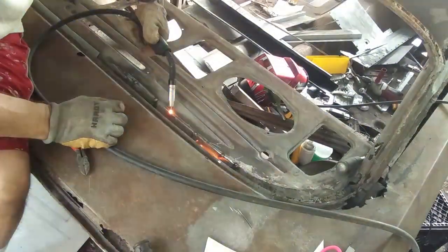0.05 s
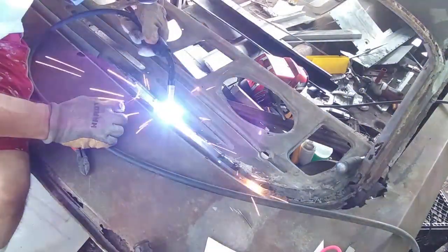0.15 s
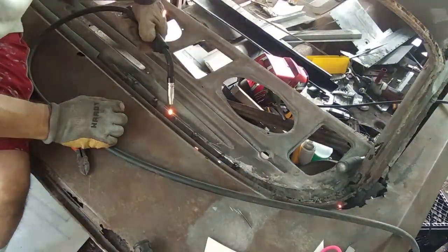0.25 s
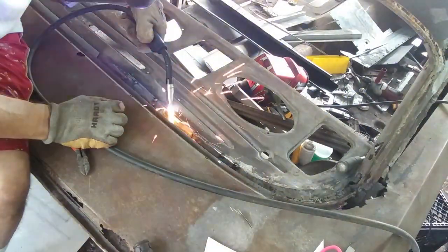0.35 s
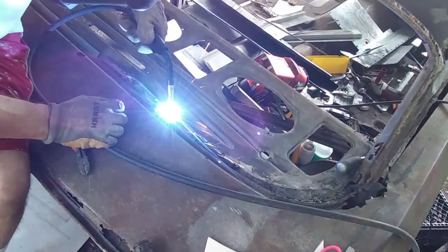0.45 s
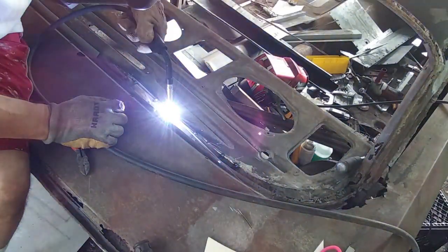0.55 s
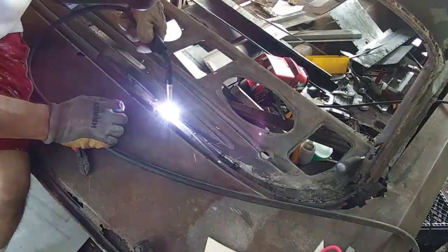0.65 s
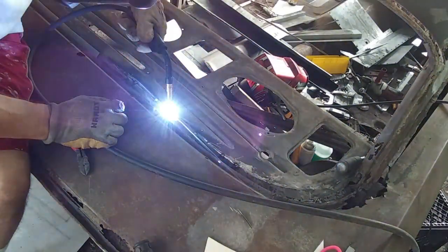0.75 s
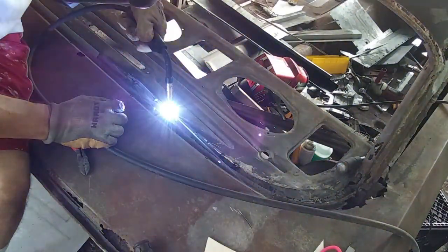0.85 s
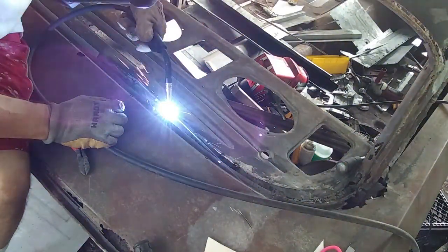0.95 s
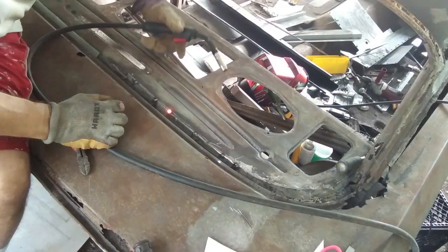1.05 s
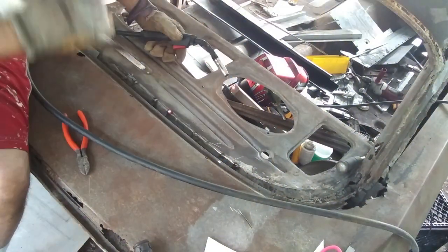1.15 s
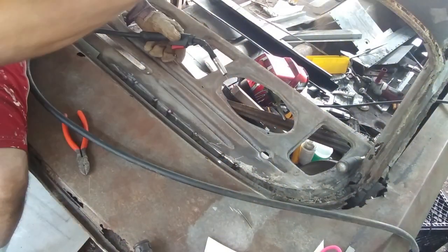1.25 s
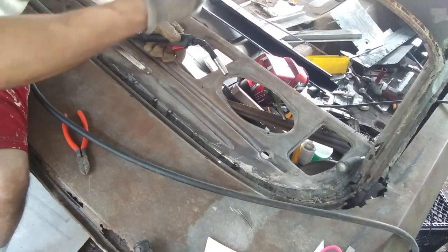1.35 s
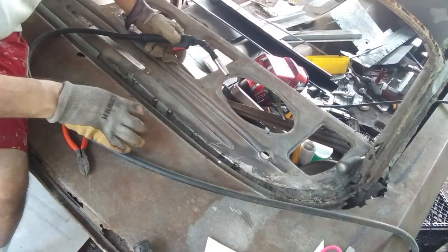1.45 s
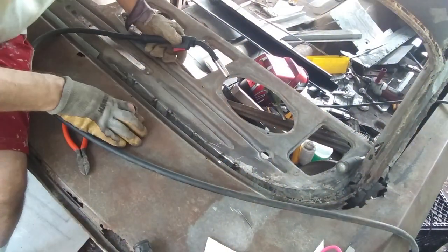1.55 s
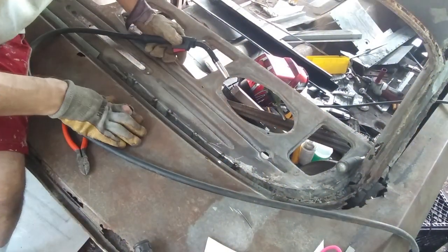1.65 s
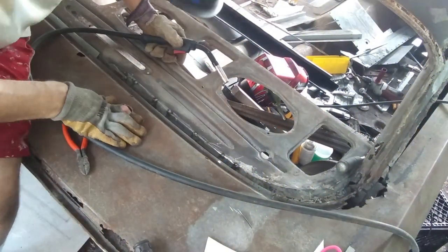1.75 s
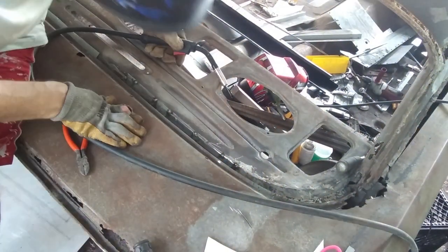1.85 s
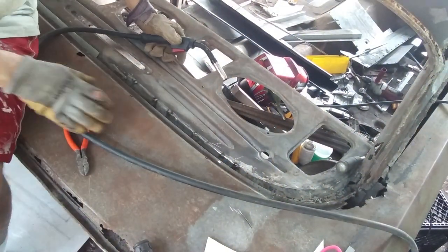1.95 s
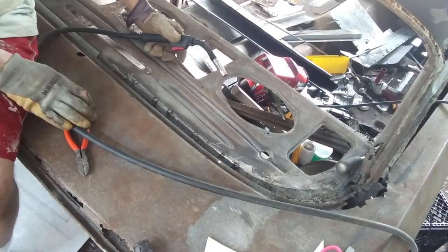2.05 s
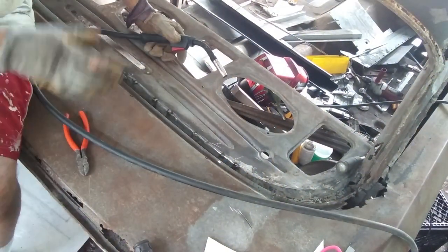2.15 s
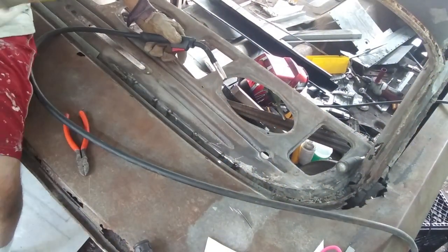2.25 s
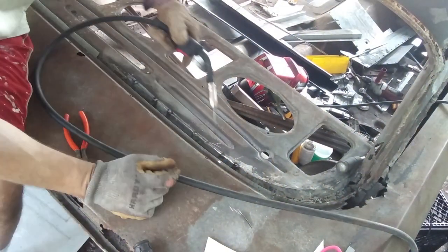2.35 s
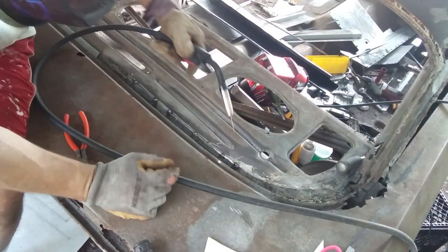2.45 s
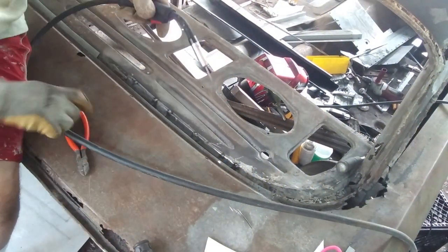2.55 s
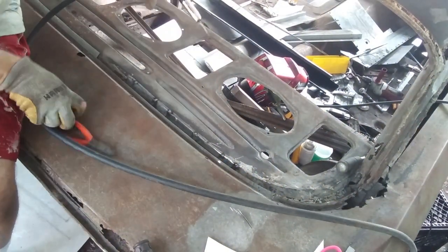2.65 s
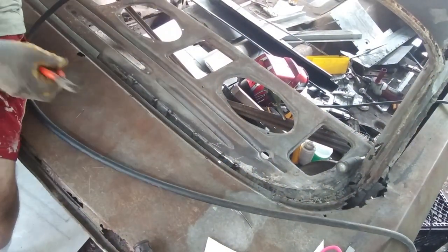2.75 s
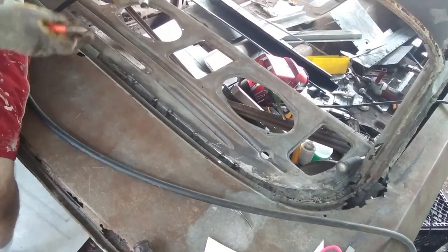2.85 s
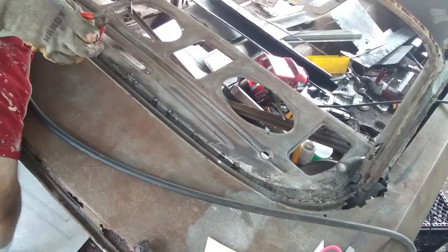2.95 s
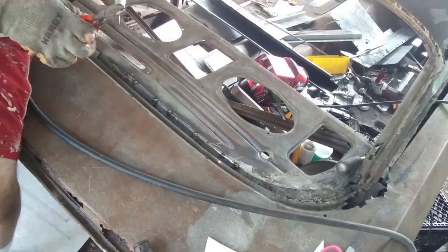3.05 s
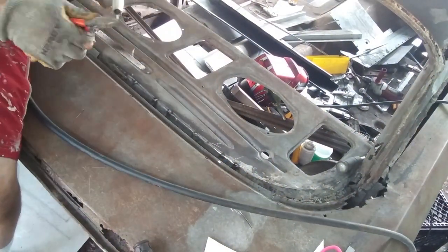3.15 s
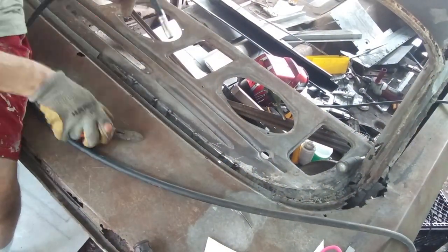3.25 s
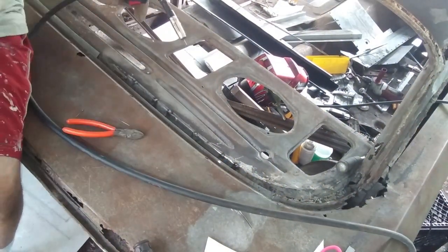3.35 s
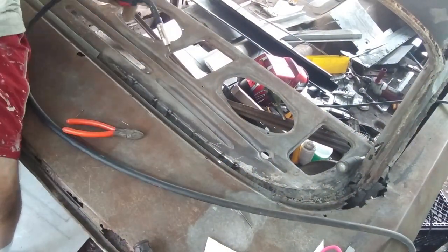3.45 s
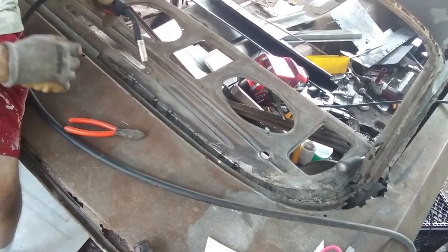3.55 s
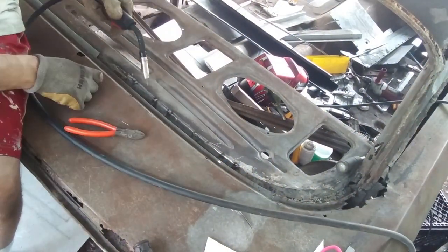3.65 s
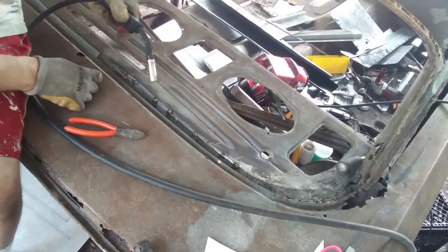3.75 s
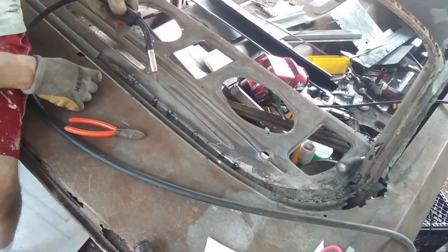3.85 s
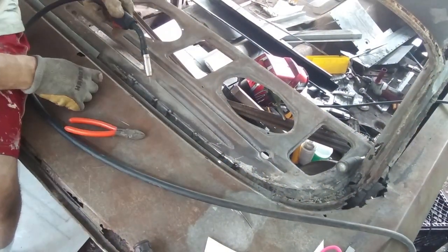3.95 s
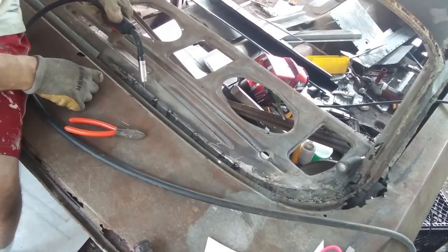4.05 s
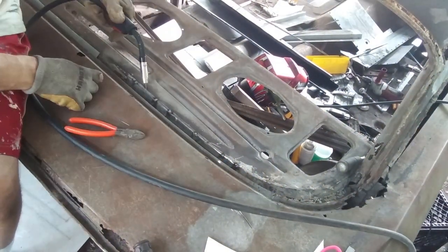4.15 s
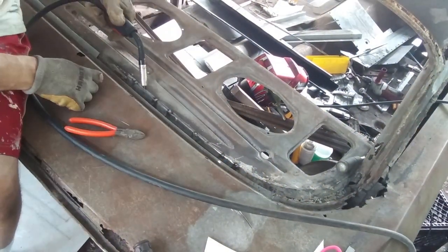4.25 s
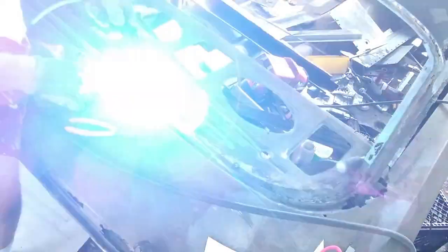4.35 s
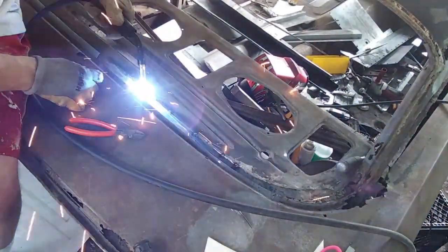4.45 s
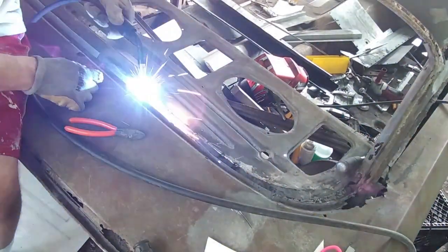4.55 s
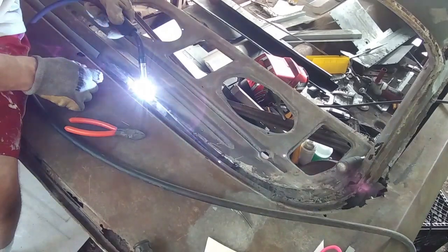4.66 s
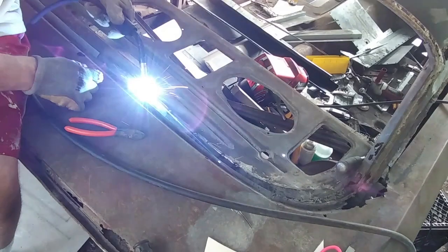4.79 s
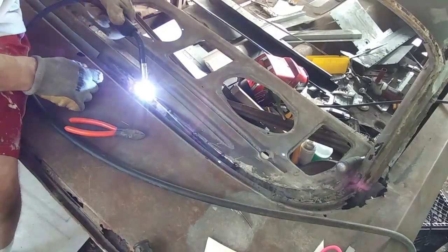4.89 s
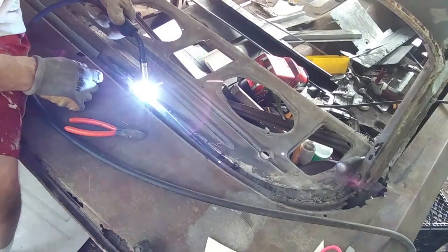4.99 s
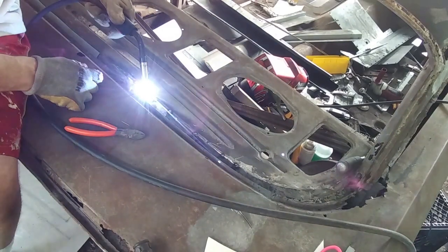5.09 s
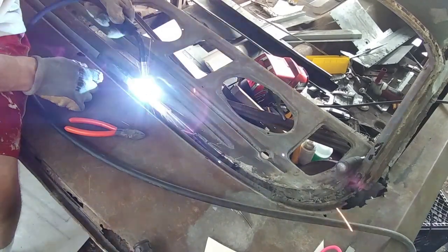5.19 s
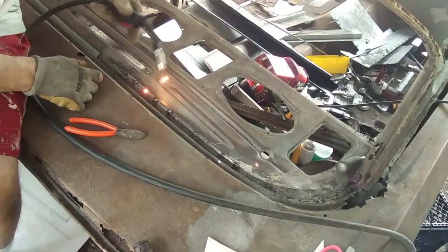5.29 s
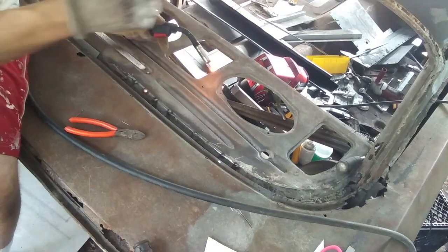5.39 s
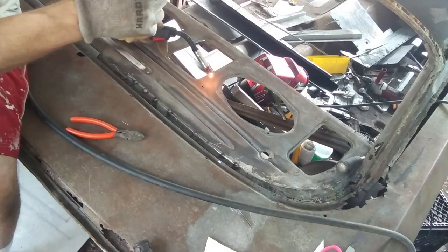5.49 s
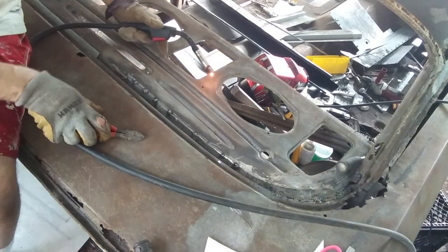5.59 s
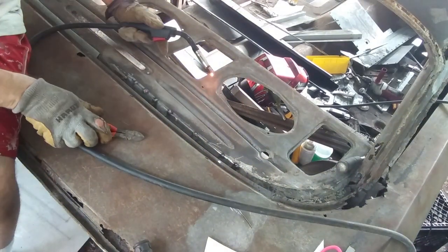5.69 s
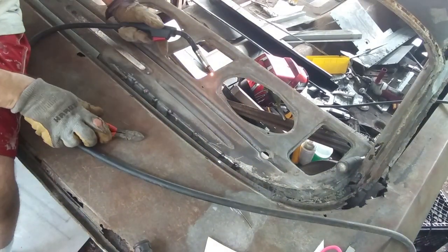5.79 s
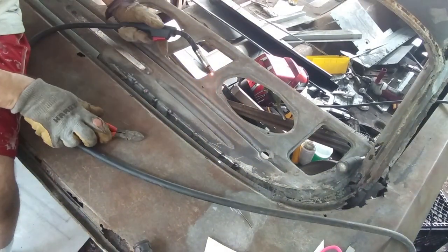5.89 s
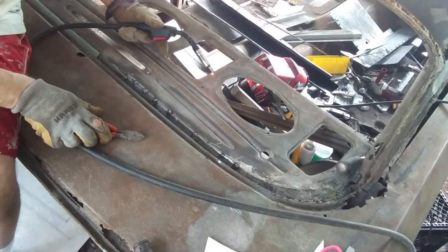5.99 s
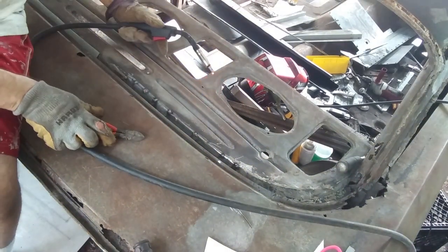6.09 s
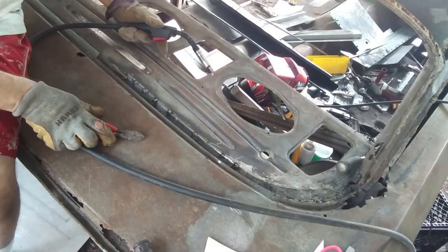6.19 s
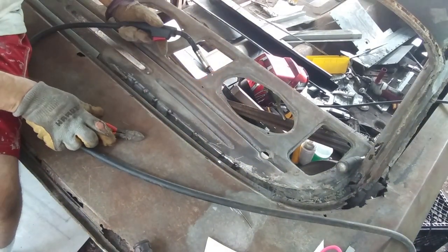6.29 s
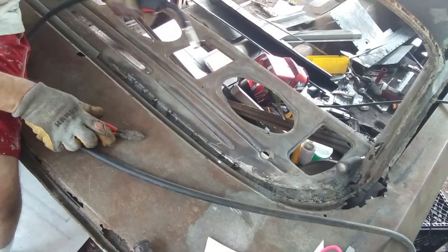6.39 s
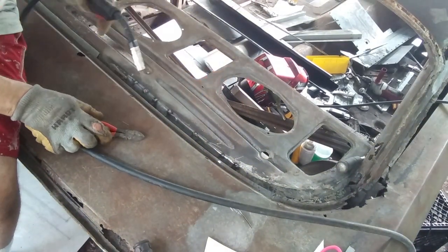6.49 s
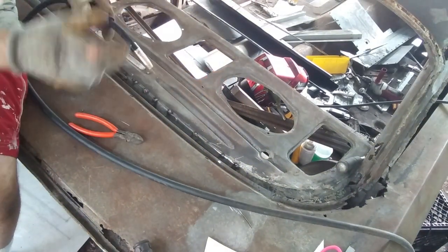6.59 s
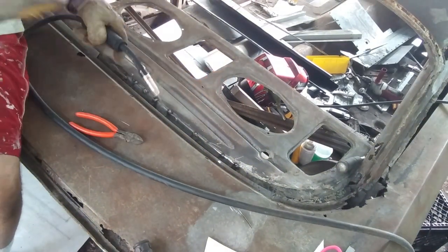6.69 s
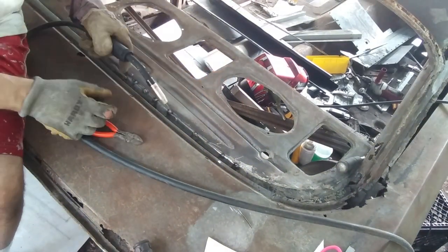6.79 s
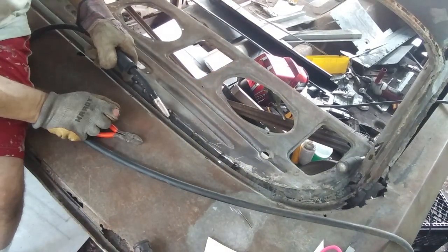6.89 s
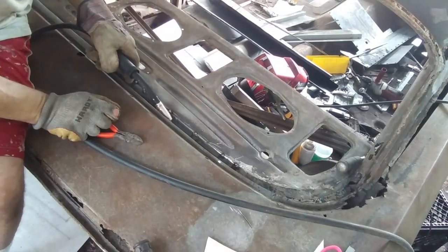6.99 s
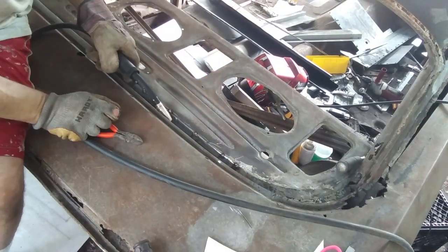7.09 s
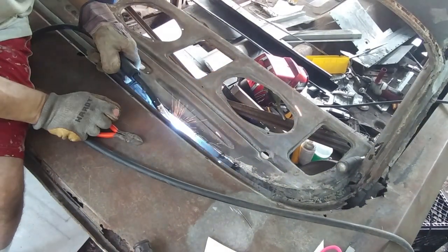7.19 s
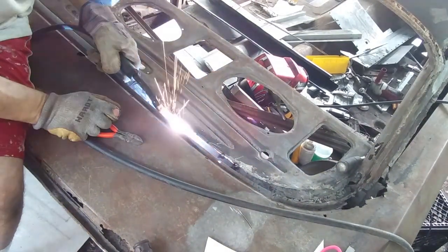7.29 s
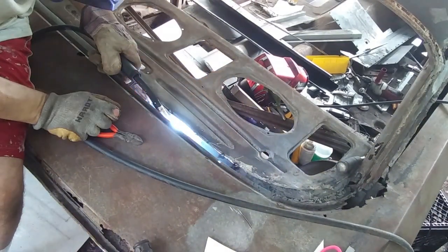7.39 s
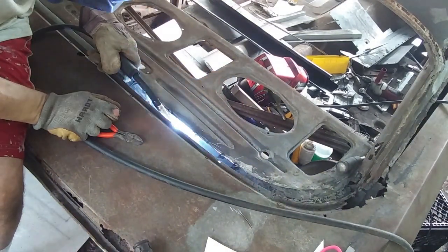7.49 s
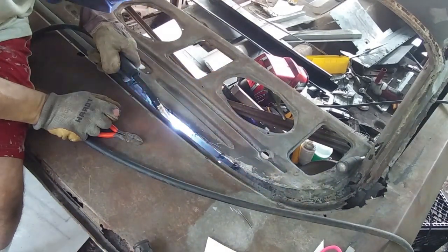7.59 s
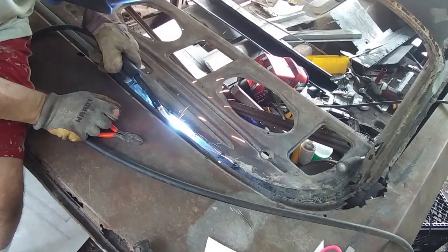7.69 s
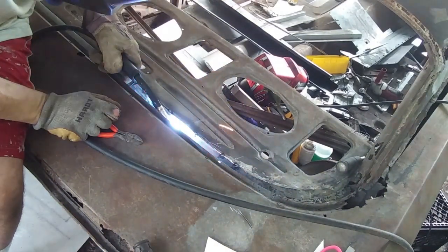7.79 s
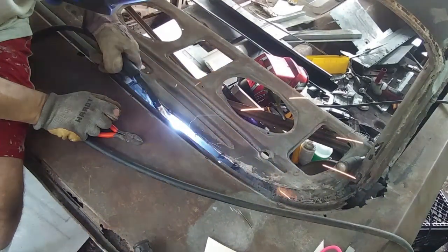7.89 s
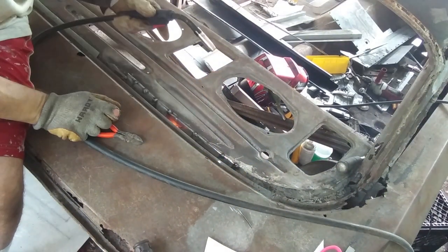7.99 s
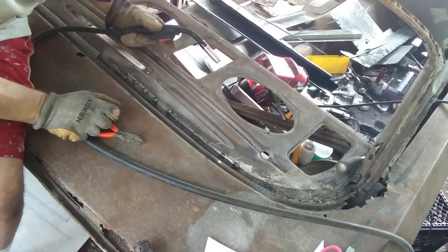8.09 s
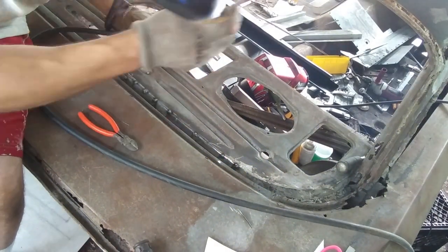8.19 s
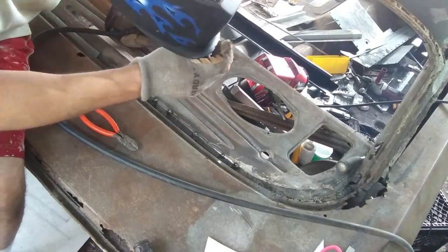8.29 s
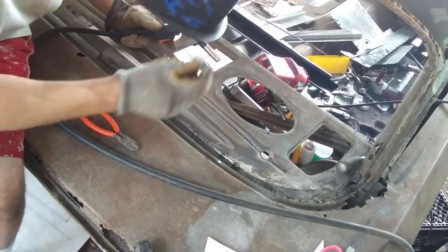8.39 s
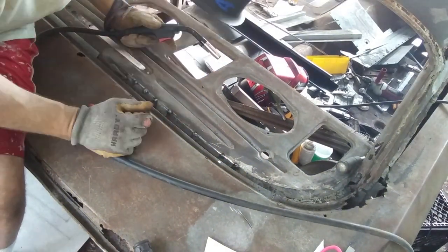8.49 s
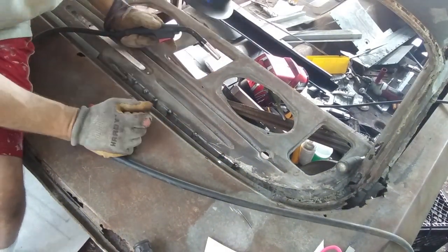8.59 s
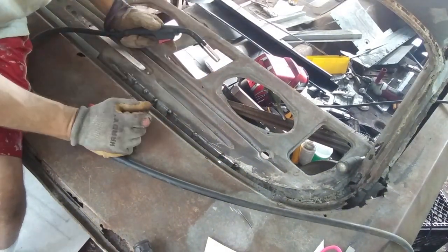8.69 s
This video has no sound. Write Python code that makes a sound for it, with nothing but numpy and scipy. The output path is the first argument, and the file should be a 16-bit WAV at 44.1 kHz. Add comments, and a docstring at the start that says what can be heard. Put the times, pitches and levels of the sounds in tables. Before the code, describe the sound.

A wire welder crackles and spits in three short beads on a sheet-steel door, with tool clatter between, over steady fan rush and faint whine.

```python
"""A workshop where a MIG welder lays three short beads on a sheet-steel car door, heard close up.
The arc is noise that hisses and spits; each short of the wire into the pool pops as a click and a scatter.
Between beads, cutters and torch knock and ring as bursts and modes, and slides rub as filtered noise.
The live wire grazes the door once, in gritty bursts. Under it all a fan rushes and whines, a far motor
sags under load and other machines whistle faintly, as drifting sine tones."""
import sys
import numpy as np
from scipy import signal
from scipy.fft import irfft, next_fast_len
from scipy.io import wavfile
from scipy.ndimage import uniform_filter1d

SR = 44100
rng = np.random.default_rng(int(sys.argv[2]) if len(sys.argv) > 2 else 0)


def wrap_up_sound(samples):
    """Save the sound to the file named by the first command line argument, as 16-bit audio."""
    columns = np.atleast_2d(samples).T
    # keep every value between -1 and 1, then stretch to whole-number steps
    tamed = np.clip(columns, -1, 1)
    steps = np.round(tamed * 32767).astype(np.int16)
    wavfile.write(sys.argv[1], SR, steps)


N = 385434
TIME = np.arange(N) / SR

# resonances of the sheet-steel door, scaled by each user's depth: (centre_hz, width_hz, height_db)
DOOR = [(1910, 140, 2.5), (2170, 110, 2.4), (2520, 630, 7), (3273, 169, 5), (3530, 160, 9.5),
        (4010, 380, 12.5), (4360, 87, 11), (4790, 140, 11.5), (5180, 85, -6), (5165, 250, 14),
        (5596, 136, 14), (5970, 130, 11), (6472, 193, 14.5), (6950, 400, 13), (7270, 120, 2.5),
        (7714, 70, 13.5), (9130, 260, 2.5), (9840, 220, 10), (10070, 170, 10), (10560, 110, 13.5),
        (11320, 510, 9), (12400, 89, 10), (12770, 430, -2.5), (13264, 184, 4.5), (13300, 450, -13.5),
        (14000, 144, -3)]
# burning arcs: (start_s, end_s, relative hiss_db, strike flare_db, burnback_change_db, pop crack_over_ring_db)
ARCS = [(0, 0.067, -41.5, 4.5, -0.5, 15), (0.13, 0.279, -43, 8.5, 0.5, 20),
        (0.378, 1.091, -42, 8, -2.5, 16), (4.311, 5.331, -42.5, 11.5, 0, 15),
        (7.155, 7.298, -40.5, 7.5, 0.5, 11), (7.352, 8.044, -41, 8.5, -6.5, 11)]


def amp(db):
    """Decibels to gain."""
    return 10 ** (np.asarray(db) / 20)


def unit(x):
    """Scales to an rms of 1."""
    return x / np.sqrt(np.mean(x ** 2) + 1e-20)


def add(mix, s, sound):
    """Mixes a sound in at time s, in place."""
    part = mix[max(0, round(s * SR)):][:len(sound)]
    part += sound[:len(part)]


def drift(top_hz):
    """Smooth random movement of rms 1, with all rates of change up to top_hz."""
    size = next_fast_len(N, real=True)
    count = int(top_hz * size / SR) + 1
    spectrum = rng.standard_normal((count, 2)) @ [1, 1j]
    return unit(irfft(spectrum, size)[:N])


def band(x, hz, kind, order=2):
    """Butterworth filter."""
    return signal.sosfilt(signal.butter(order, hz, kind, fs=SR, output="sos"), x)


def colour(x, spectrum, resonances, depth, size=4096):
    """Minimum-phase filter of unit power: a smooth spectrum with resonances standing on it."""
    hz = abs(np.fft.fftfreq(size, 1 / SR))
    points, level = np.transpose(spectrum)
    smooth = np.interp(np.log(hz + 1), np.log(points), level)
    ripple = sum(db * np.exp(-np.log(2) * (2 * (hz - f) / width) ** 2) for f, width, db in resonances)
    # the resonances leave the broad balance alone
    ripple = ripple - uniform_filter1d(ripple, size // 16, mode="wrap")
    gain = amp(np.maximum(smooth + depth * ripple, -90))
    taps = np.fft.ifft(np.exp(np.conj(signal.hilbert(np.log(gain))))).real[:size // 2]
    return signal.oaconvolve(x, taps / np.linalg.norm(taps))[:N]


def thud(db, t60=0.023, top_hz=1300):
    """A dull low thud: one low-passed impulse with a short decaying flutter."""
    t = np.arange(SR // 30) / SR
    push = rng.standard_normal(len(t)) * amp(-60 * t / t60) * .08
    push[0] += 1
    push = band(push, top_hz, "low")
    return amp(db - 5.0) * unit(push)


def bursts(rows, spectrum, resonances, depth, grain_db, rise_s, treble_decay):
    """Sudden gritty bursts that ring in steel in three bands; the treble dies first."""
    # crossovers between low, middle and high: (low_hz, high_hz)
    band_edges = [4500, 9000]
    out = np.zeros(N)
    grit = rng.standard_normal(N) * amp(grain_db * drift(2700))
    steel = colour(grit, spectrum, resonances, depth)
    low, high = band_edges
    parts = [band(steel, low, "low", order=5),
             band(steel, [low, high], "band", order=5),
             band(steel, high, "high", order=5)]
    t = np.arange(SR // 4) / SR
    rise = 1 - np.exp(-t / rise_s)
    for k, part in enumerate(parts):
        power = np.zeros(N)
        for s, *levels, t60 in rows:
            band_t60 = t60 * treble_decay ** (k - 1)
            add(power, s, (amp(levels[k] - 60 * t / band_t60) * rise) ** 2)
        out += np.sqrt(power) * unit(part)
    return out


def ringing(modes, damping):
    """One blow on a set of decaying modes with random phases, scaled to a peak of 1."""
    t = np.arange(SR // 4) / SR
    ring = np.zeros(len(t))
    for hz, db, t60 in modes:
        decay = amp(db - 60 * t * damping / min(t60, .25))
        ring += decay * np.sin(2 * np.pi * (hz * t + rng.random()))
    return ring / abs(ring).max()


def reflect(x):
    """Nearby steel throws the sound back a few times."""
    # echoes from nearby steel: (delay_s, level_db)
    echoes = [(.0032, -12.5), (0.011, -11), (.0175, -22), (.0186, -39)]
    out = x.copy()
    for delay, db in echoes:
        add(out, delay, amp(db) * x)
    return out


def workshop(x, room_db=-21, t60=0.32, treble_t60=0.084):
    """A faint diffuse tail from the walls, shorter in the treble."""
    t = np.arange(SR // 2) / SR
    wash = rng.standard_normal(len(t)) * (1 - np.exp(-t / 0.055))
    body = band(wash, 4000, "low") * amp(-60 * t / t60)
    # played backwards, the wash is at full strength early on
    treble = band(wash[::-1], 8400, "high") * amp(-60 * t / treble_t60) * (t > .008)
    tail = body + treble
    return x + amp(room_db) * signal.fftconvolve(x, tail / np.linalg.norm(tail))[:N]


def far_whistles(waver_db=5.0, wander=.002):
    """Thin tones of far machines glide as they swell in and out."""
    # whistles: (start_s, length_s, first_hz, last_hz, level_db before the waver)
    whistle_rows = [(1.6, .45, 790, 960, -97), (2.346, 1.14, 1190, 1167, -87),
                    (4.6, 2.18, 991.4, 970, -88.5), (5.779, .22, 1490, 1395, -79),
                    (6.923, 0.24, 1032, 1154, -85), (8, 0.24, 1063, 1154, -76.5)]
    out = np.zeros(N)
    waver = amp(waver_db * drift(5))
    bend = 1 + wander * drift(20)
    for s, length, first_hz, last_hz, db in whistle_rows:
        along = np.clip((TIME - s) / length, 0, 1)
        hz = (first_hz + (last_hz - first_hz) * along) * bend
        swell = np.sqrt(2 * abs(np.sin(np.pi * along)))
        out += amp(db) * swell * np.sin(2 * np.pi * np.cumsum(hz) / SR)
    return out * waver


def far_motor(waver_db=3.0, wander=.002):
    """A far motor sags under load and picks up again; its harmonic partials fade in and out."""
    # speed and loudness over time: (time_s, pitch_hz, level_db)
    motor_course = [(0, 550, -78), (.8, 538, -90), (.92, 541.5, -75), (1.45, 540, -78.5), (1.9, 536, -86),
                    (2.4, 538, -80.5), (2.7, 535, -79.5), (3.28, 526, -77.5), (3.45, 579, -73.5),
                    (3.619, 592, -74.5), (3.85, 558, -70.5), (4, 545, -75), (4.299, 524.5, -82),
                    (4.7, 509, -68.5), (5.2, 499, -83), (6, 511, -85.5), (6.85, 511, -79.5),
                    (7.3, 515, -89)]
    # harmonics: (multiple of the pitch, relative level_db)
    motor_partials = [(1, -25), (2, -9.5), (3, 2), (4, 0), (5, -1)]
    # one partial sings out: (centre_s, length_s, multiple, lift_db)
    motor_sings = [(0.976, 0.29, 3, 13.5), (1.435, 0.45, 5, 16), (2.941, .2, 5, 15.5), (3.12, .25, 4, 19),
                   (3.888, 0.82, 5, 13), (4.096, 1.75, 2, 14)]
    s, *columns = np.transpose(motor_course)
    hz, level = (np.interp(TIME, s, c) for c in columns)
    phase = 2 * np.pi * np.cumsum(hz * (1 + wander * drift(22.3))) / SR
    out = np.zeros(N)
    for k, db in motor_partials:
        lift = np.zeros(N)
        for at, length, multiple, lift_db in motor_sings:
            if multiple == k:
                add(lift, at - length / 2, lift_db * np.hanning(int(length * SR)))
        out += amp(level + db + lift + waver_db * drift(8.2)) * np.sin(k * phase)
    return np.sqrt(2) * out


def fan(wander=0.00076, waver_db=1.6, swell_db=.5, rattle=.3, rattle_db=3.0, fade_db=1.0):
    """Air noise rushes through the welder's housing under a wavering whine and a rattly bearing."""
    # the fan's speed follows the mains: (time_s, pitch_hz)
    fan_speed = [(0, 469.8), (3.6, 467.3), (4, 466.3), (5.7, 466), (6.4, 468.6), (6.8, 471.3), (7.9, 472.3),
                 (8.12, 471.1), (8.74, 470.7)]
    # whine at the usual speed: (multiple of the pitch, level_db)
    whine_partials = [(16, -75.5), (20, -63.5), (24, -69.5), (28, -83), (32, -77)]
    # the bearing moves to its lower tone as the fan speeds up: (multiple, level_db, change_db per Hz of speed)
    bearing_tones = [(7, -70, 2), (14, -67, -2.6)]
    # smooth colour of the air: (frequency_hz, relative level_db)
    air_colour = [(18, -67), (30, -32), (596, -35), (981, -26), (1660, -12.5), (2150, -6), (2950, -4),
                  (3190, -5.5), (3830, -1.5), (5390, -4), (5990, -3.5), (8640, -8), (9600, -7),
                  (10700, -8.5), (15800, -17.5)]
    # resonances of the housing, scaled by depth: (centre_hz, width_hz, height_db)
    housing = [(547, 90, 0.5), (820, 110, 0.5), (2160, 120, 5), (2960, 250, -7.5), (3220, 150, 4.5),
               (3860, 190, 3.5), (4794, 64, 7), (5440, 400, -1.5), (6010, 290, 6), (6420, 37, 5),
               (15100, 600, 3)]
    usual_hz, whine_db_per_hz, air_db = 468, 1, -55
    hz = np.interp(TIME, *np.transpose(fan_speed))
    faster_hz = hz - usual_hz
    phase = 2 * np.pi * np.cumsum(hz * (1 + wander * drift(7))) / SR
    whine = np.zeros(N)
    for k, db in whine_partials:
        whine += amp(db + waver_db * drift(11)) * np.sin(k * phase)
    whine *= amp(whine_db_per_hz * faster_hz)
    slip = rattle * drift(50) / bearing_tones[0][0]
    for k, db, db_per_hz in bearing_tones:
        level = db + db_per_hz * faster_hz + rattle_db * drift(30) + fade_db * drift(3.7)
        whine += amp(level) * np.sin(k * (phase + slip))
    air = colour(rng.standard_normal(N), air_colour, housing, depth=0.96)
    return np.sqrt(2) * whine + amp(air_db + swell_db * drift(17)) * air


def handling(knock_db=0.5, slide_db=1, tick_db=13, cutters_db=3):
    """Cutters and torch tick, knock and ring on bench and door; gloves, hose and cutters slide over steel."""
    # knocks: (start_s, relative level_db, brightness_db per band, middle-band t60_s)
    knock_rows = [(1.254, -46, 2, 0.032), (1.398, -56, 12.5, 0.043), (2.342, -49, -1.5, 0.089),
                  (2.648, -46, 2.5, 0.23), (2.701, -26.5, 2, 0.06), (2.766, -35.5, 0.5, 0.059),
                  (3.189, -41, 12, 0.035), (3.296, -21.5, 2.5, 0.034), (3.312, -24, 1, 0.047),
                  (3.318, -29, 4, 0.072), (3.349, -49, -7, 0.044), (3.6992, -24, 4, 0.13),
                  (3.7023, -27, -1, 0.028), (3.7368, -25, 8.5, 0.12), (6.76, -44.5, 0.5, .052),
                  (6.9, -32.5, 7, 0.065), (6.962, -52.5, 3, .2), (8.179, -51.5, -2, 0.092),
                  (8.499, -44.5, 3, .058)]
    # modes of the cutters, rung by every knock: (pitch_hz, relative level_db, t60_s before damping)
    cutter_modes = [(2820, -12, 0.22), (3980, 3, 0.099), (6000, 1.5, 0.13), (6100, -6, 0.085),
                    (6300, 14, 0.091), (7300, -11, 0.092), (7960, -21, 0.059), (8600, 1, 0.13),
                    (8800, -2, 0.054), (11400, -18, 0.12)]
    # light clinks of the torch nozzle: (start_s, peak_db before the high-pass)
    clink_rows = [(1.201, -38.5), (1.256, -34.5), (3.349, -36), (6.761, -28)]
    # modes of the nozzle: (pitch_hz, relative level_db, t60_s before damping)
    nozzle_modes = [(2740, -19, 0.033), (3070, -7, 0.024), (3550, -8, 0.031), (3828, -33, 0.16)]
    # the cutters bite through the wire: (start_s, peak_db)
    snip = (3.1897, -17)
    # the cutters land flat and push out air: (start_s, relative level_db)
    drop_puff = (3.703, -65)
    # slides: (centre_s, length_s, relative level_db)
    slide_rows = [(1.881, 0.076, -51), (2.423, 0.069, -52.5), (2.5, 0.096, -51), (2.67, 0.19, -45.5),
                  (2.76, 0.023, -45), (3.13, 0.12, -56), (3.214, 0.06, -50), (4.296, 0.037, -51),
                  (7.05, 0.034, -49), (8.527, 0.053, -56)]
    # smooth colour of struck and rubbed steel: (frequency_hz, relative level_db)
    knock_colour = [(59, -88), (100, -60), (524, -55.5), (1420, -16.5), (2220, -8.5), (2690, -3.5),
                    (3620, -3), (3940, -2.5), (4980, -4), (7940, -7), (9610, -8), (10500, -10),
                    (15000, -18.5), (16000, -15)]
    # resonances of the bench, scaled by depth: (centre_hz, width_hz, height_db)
    bench = [(1380, 390, 5.4), (1960, 37, 3.8), (2600, 240, 6.4), (3640, 84, 4.6), (4270, 550, 6.6),
             (4590, 100, 7.3), (5640, 150, 4.9), (6300, 127, 2.7), (6850, 170, 15.5), (7500, 180, 13),
             (8300, 1800, 6.8), (9220, 130, 5.9), (9260, 470, 11), (10800, 420, 8.9), (11980, 229, 20),
             (13400, 150, 24)]
    blows = [(s, db - bright, db, db + bright, t60) for s, db, bright, t60 in knock_rows]
    out = amp(knock_db) * bursts(blows, knock_colour, bench, depth=0.59, grain_db=3.0,
                                 rise_s=0.00089, treble_decay=0.66)
    tick = np.array([-.5, 1, -.5])
    for s, low, middle, high, t60 in blows:
        add(out, s, amp(high + tick_db) * tick)
        ring = amp(middle + cutters_db) * ringing(cutter_modes, damping=1.7)
        add(out, s, band(ring, 1500, "high", order=4))
    for s, db in clink_rows:
        clink = amp(db) * ringing(nozzle_modes, damping=1.1)
        add(out, s, band(clink, 1500, "high", order=4))
    add(out, snip[0], amp(snip[1]) * tick)
    add(out, drop_puff[0], thud(drop_puff[1]))
    stroke = np.zeros(N)
    for s, length, db in slide_rows:
        add(stroke, s - length / 2, amp(db) * np.hanning(int(length * SR)))
    rub = unit(rng.standard_normal(N) * amp(1.5 * drift(400)))
    return out + amp(slide_db) * colour(stroke * rub, knock_colour, bench, depth=.3)


def door_edge(damping=1.2):
    """The dropped cutters and the graze's bang leave a high modal ring in the door's edge."""
    # blows: (start_s, peak_db before the high-pass)
    edge_blows = [(3.737, -20), (5.463, -14.5)]
    # modes of the edge: (pitch_hz, relative level_db, t60_s before damping)
    edge_modes = [(7230, -8, 0.11), (7140, -9, 0.038), (7270, -6, 0.025), (8400, -6, 0.12),
                  (8600, -8, 0.11)]
    out = np.zeros(N)
    for s, db in edge_blows:
        ring = amp(db) * ringing(edge_modes, damping)
        add(out, s, band(ring, 4000, "high", order=6))
    return out


def graze(graze_db=2, grain_db=2):
    """The live wire touches the door, bangs and sputters away in bursts of gritty noise."""
    # bangs: (start_s, relative level_db, middle-band t60_s)
    bang_rows = [(5.461, -23.5, 0.18), (5.468, -26.5, 0.16), (5.523, -27, 0.19), (5.552, -33.5, 0.15),
                 (5.572, -33, 0.18), (5.592, -34, 0.16), (5.632, -40.5, 0.12)]
    # balance of every bang: (low_db, middle_db, high_db)
    bang_balance = (-10, -1, 5.5)
    # push of air from the bang: (start_s, relative level_db)
    bang_puff = (5.464, -51.5)
    # smooth colour of the bangs: (frequency_hz, relative level_db)
    bang_colour = [(120, -76), (200, -55), (749, -45), (1400, -21.5), (2330, -17.5), (2510, -15),
                   (3490, -8.5), (4600, -2.5), (5420, -11), (5940, 0.5), (6280, -1.5), (13600, 5),
                   (16000, -2)]
    bangs = [(s, *(db + np.array(bang_balance)), t60) for s, db, t60 in bang_rows]
    out = amp(graze_db) * bursts(bangs, bang_colour, DOOR, depth=0.46, grain_db=grain_db,
                                 rise_s=0.00028, treble_decay=0.72)
    add(out, bang_puff[0], thud(bang_puff[1], t60=0.038, top_hz=1110))
    return out


def squeals(spread=0.07):
    """Gas squeals out of the molten pool: short fuzzy whistles of narrow-band noise."""
    # squeals: (centre_s, length_s, pitch_hz, level_db at the height of the swell)
    squeal_rows = [(0.33, 0.064, 9200, -49), (0.391, 0.042, 4480, -34.5), (0.459, 0.043, 4800, -36),
                   (0.529, 0.058, 4780, -38.5), (7.315, 0.057, 4530, -45), (7.416, 0.049, 4392, -42.5)]
    out = np.zeros(N)
    for s, length, hz, db in squeal_rows:
        n = int(length * SR)
        tone = unit(band(rng.standard_normal(n), [hz * (1 - spread), hz * (1 + spread)], "band"))
        add(out, s - length / 2, amp(db) * tone * np.hanning(n))
    return out


def shorts(crack_spread_db=2.0, jitter_s=0.0014):
    """Every short of the wire, with stutters and relights: (start_s, crack_db, ring_db, thud_db)."""
    # the wire shorts into the pool: (start_s, stutter_length_s, relative door ring_db, relative low thud_db)
    pop_rows = [(.003, 0.0021, -28, -69), (.041, 0.012, -26, -66), (.126, 0.0055, -29.5, -77),
                (0.136, 0.0013, -39, -87), (.192, 0, -26, -55), (.219, 0, -26.5, -70),
                (.26, 0.0058, -28, -67.5), (0.377, 0.000079, -37.5, -95), (.39, 0, -27.5, -72),
                (.452, 0.0023, -30, -61), (.493, 0.0018, -29.5, -73), (.508, 0.0063, -29, -75),
                (.572, 0, -27, -69.5), (.531, 0, -31.5, -77), (0.617, 0.0017, -25.5, -72),
                (0.649, 0, -34, -79), (.681, 0, -28, -62.5), (.716, 0.0012, -30.5, -89),
                (.748, 0.032, -29.5, -82), (.809, 0.0058, -32, -77), (0.851, 0, -28, -86),
                (.885, 0.0002, -30, -71), (.931, 0, -27.5, -69), (.95, 0, -27, -60.5),
                (.997, 0.0035, -27.5, -92), (1.016, 0, -35.5, -85), (4.327, 0, -26, -74),
                (4.409, 0, -27, -52.5), (4.428, 0, -34, -77), (4.454, 0, -38, -80),
                (4.467, 0.012, -26, -69), (4.496, 0.00054, -25.5, -57.5), (4.513, 0.011, -27, -63),
                (4.542, .006, -30.5, -75), (4.559, 0.002, -25, -67), (4.602, 0.0036, -26.5, -77),
                (4.661, 0, -28, -79), (4.678, 0.0013, -35, -81), (4.721, 0.003, -26, -66),
                (4.78, 0, -25.5, -79), (4.817, 0.0025, -26, -86), (4.841, 0.0029, -28, -71),
                (4.872, 0.00047, -30.5, -80), (4.896, 0.0095, -29.5, -81), (4.979, 0.0054, -28, -65.5),
                (5.001, 0, -34, -82), (5.037, 0.0043, -28.5, -79), (5.057, 0.00077, -25.5, -71),
                (5.091, 0.0015, -28, -75), (5.123, .008, -29, -80), (5.18, 0, -26.5, -87),
                (5.214, 0.0064, -31, -67.5), (5.246, 0.0057, -30.5, -72), (5.27, 0.00038, -31, -71),
                (5.318, 0.0021, -36.5, -91), (7.172, 0.015, -36, -73.5), (7.217, 0.00078, -27, -59.5),
                (7.255, 0.003, -28.5, -73), (7.349, 0.0078, -33.5, -69), (7.408, 0.00084, -30, -77),
                (7.457, 0, -27, -67), (7.503, 0.0021, -28, -67.5), (7.562, .021, -30.5, -73),
                (7.614, 0.011, -31, -74), (7.665, 0.013, -27.5, -71.5), (7.711, 0, -35, -76),
                (7.737, 0.024, -27.5, -71), (7.808, 0, -28, -75), (7.838, 0, -30, -77),
                (7.883, 0.0045, -28, -71), (7.907, 0.00083, -32.5, -71), (7.935, 0.0099, -27.5, -63.5),
                (7.976, 0, -23, -69)]
    stutter_gap_s = .009
    # after some pops the arc relights with a dry crack that hardly rings
    relight_share, relight_crack_db, relight_ring_db = .35, -2.5, -11
    rows = []
    for (s, length, ring, dull), (chance, place) in zip(pop_rows, rng.random((len(pop_rows), 2))):
        nearest_arc = min(ARCS, key=lambda arc: abs(s - np.clip(s, arc[0], arc[1])))
        crack = ring + nearest_arc[-1]
        times = np.linspace(s, s + length, 1 + round(abs(length) / stutter_gap_s))
        times[1:-1] += jitter_s * rng.standard_normal(len(times[1:-1]))
        rows += [(at, crack + crack_spread_db * rng.standard_normal(), ring, dull) for at in times]
        if chance < relight_share:
            delay_s = np.interp(place, [0, 1], [.007, .014])
            rows.append((s + length + delay_s, crack + relight_crack_db,
                         ring + relight_ring_db, dull + relight_ring_db))
    return rows


def arc_pops(crack_hz=9300, crack_db=-2.5, ring_db=5.5, ring_t60=0.041, thud_db=0, restrike_db=-3, depth=0.79):
    """Each short cracks, cracks again as the arc relights, and scatters through the door's hollows."""
    # smooth colour of the scatter: (frequency_hz, relative level_db)
    pop_colour = [(290, -77), (500, -43.5), (1280, -39.5), (1790, -12), (2010, -28.5), (2610, -12.5),
                  (3650, -13), (3980, -5), (4530, -4.5), (11100, -1), (15300, -6), (16000, -11.5)]
    cracks, scatter, thuds = np.zeros((3, N))
    t = np.arange(SR // 16) / SR
    u = np.pi * crack_hz * np.arange(-12, 13) / SR
    snap = (1 - 2 * u ** 2) * np.exp(-u ** 2)  # one short pulse, strongest at crack_hz
    ring = amp(-60 * t / ring_t60) * (1 - np.exp(-t / .0003))
    hollows = rng.standard_normal(len(t))
    alike = .36  # share of the scatter's power that stays the same from pop to pop
    for s, peak, body, dull in shorts():
        add(cracks, s, amp(peak) * snap)
        restrike_s = s + rng.uniform(0.00069, .004)
        add(cracks, restrike_s, amp(peak + restrike_db - rng.exponential(4.8)) * snap)
        paths = np.sqrt(alike) * hollows + np.sqrt(1 - alike) * rng.standard_normal(len(t))
        add(scatter, s, amp(body) * ring * paths)
        add(thuds, s, thud(dull + thud_db))
    door_scatter = colour(scatter, pop_colour, DOOR, depth)
    return amp(crack_db) * reflect(cracks) + amp(ring_db) * door_scatter + thuds


def arc_level():
    """Each arc strikes, flares, settles, shifts in level as the wire burns back, and dies."""
    strike_s, settle_s = 0.021, 0.09
    burnback_s, die_db_per_s = 0.079, 800
    level = np.zeros(N)
    for start, end, db, flare_db, burnback_db, _ in ARCS:
        age = np.maximum(TIME - start, 0)
        flare = flare_db * np.exp(-age / settle_s)
        # the shift is complete halfway through the burnback
        burnback = burnback_db * np.clip(2 + 2 * (TIME - end) / burnback_s, 0, 1)
        dying = die_db_per_s * np.clip(TIME - end, 0, 1)
        level += np.minimum(age / strike_s, 1) * amp(db + flare + burnback - dying)
    return level


def arc_hiss(hiss_db=3.5, flutter_db=2.0, grain_db=2.5, depth=0.81, spits_per_s=90, spit_db=11):
    """The burning arc fizzes as fine-grained noise, flutters, and spits tiny sparks as random clicks."""
    # smooth colour of the fizz: (frequency_hz, relative level_db)
    hiss_colour = [(240, -67), (400, -44), (765, -50), (1010, -43), (1530, -27), (3020, -21.5), (3370, -23),
                   (6150, -16.5), (6740, -15), (7750, -14.5), (11400, -3.5), (13100, -6), (16000, -14.5)]
    level = arc_level()
    fizz = unit(rng.standard_normal(N) * amp(flutter_db * drift(190) + grain_db * drift(4000)))
    spits = (rng.random(N) < spits_per_s / SR) * amp(spit_db + rng.uniform(-2, 9.8, N))
    hiss = colour(level * fizz, hiss_colour, DOOR, depth)
    sparks = band(level * spits, 4000, "high", order=3)
    return amp(hiss_db) * reflect(hiss + sparks)


def scene():
    """All sources, the same in both channels; only the near ones excite the room."""
    near = handling() + door_edge() + graze() + squeals() + arc_pops() + arc_hiss()
    mix = far_whistles() + far_motor() + fan() + workshop(near)
    return np.array([mix, mix])


def record(dry):
    """A steep low-pass at 15.9 kHz limits the band."""
    taps = signal.firwin(401, 15900, window=("kaiser", 8), fs=SR)
    return signal.oaconvolve(dry, taps[None], "same")


dry = scene()
out = record(dry)
wrap_up_sound(out)
```